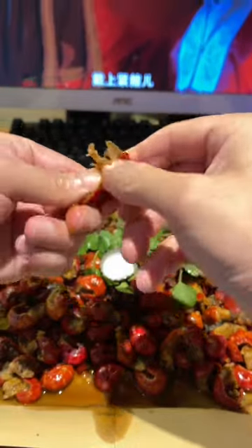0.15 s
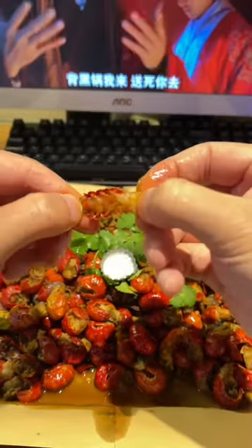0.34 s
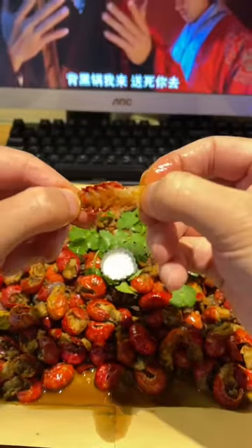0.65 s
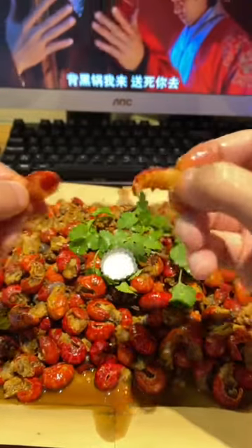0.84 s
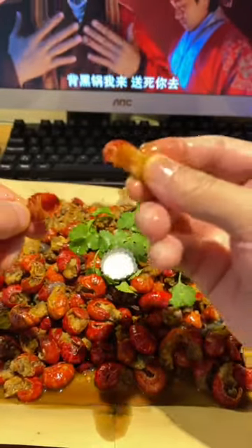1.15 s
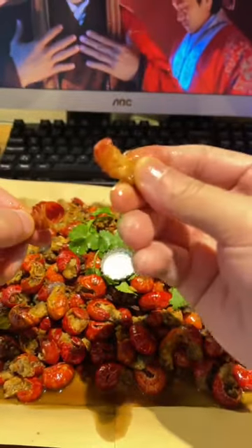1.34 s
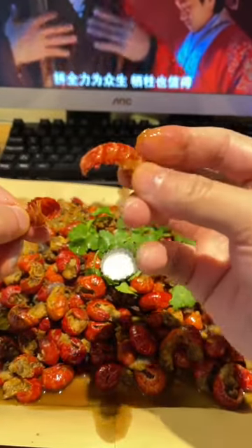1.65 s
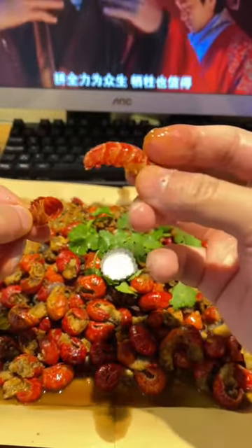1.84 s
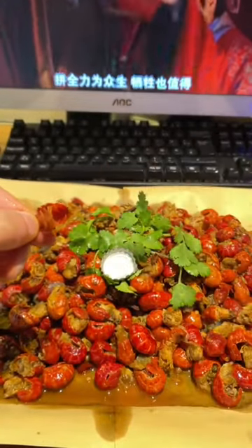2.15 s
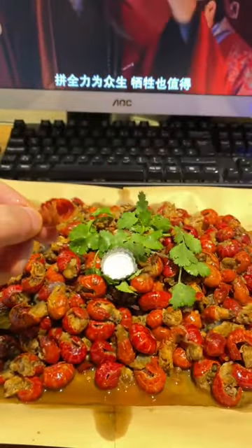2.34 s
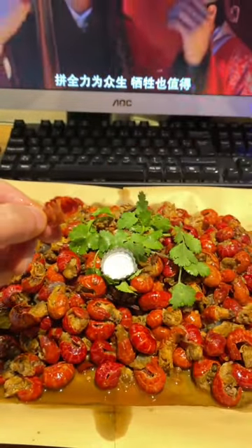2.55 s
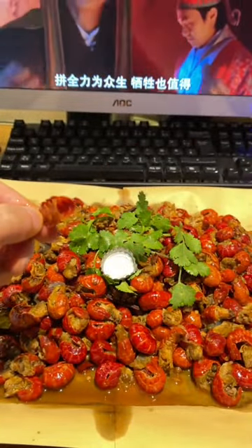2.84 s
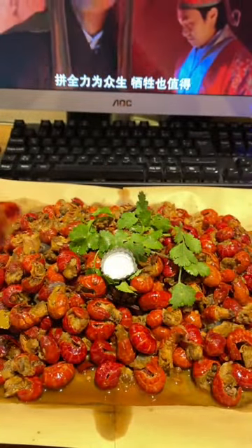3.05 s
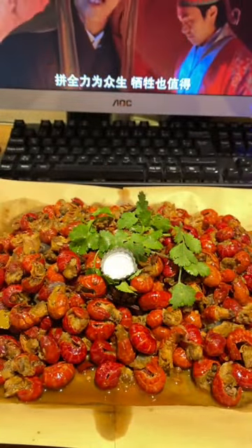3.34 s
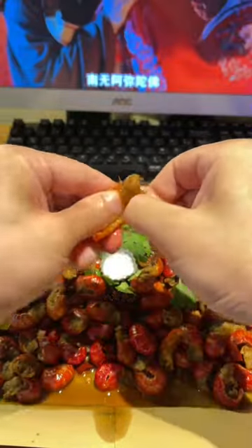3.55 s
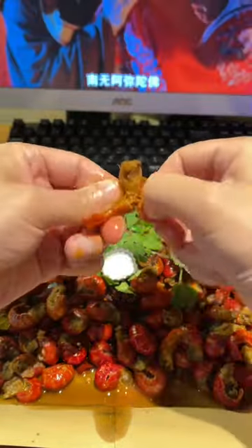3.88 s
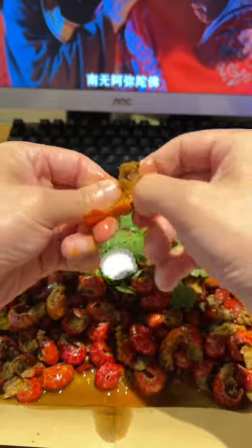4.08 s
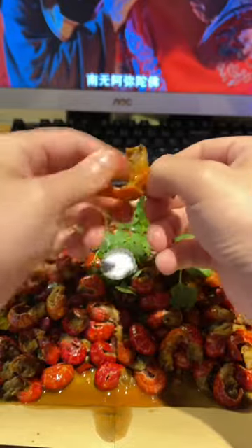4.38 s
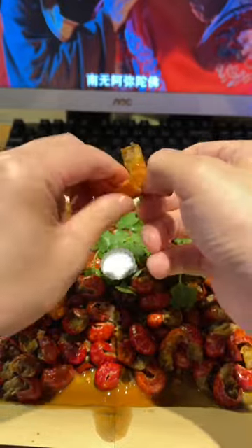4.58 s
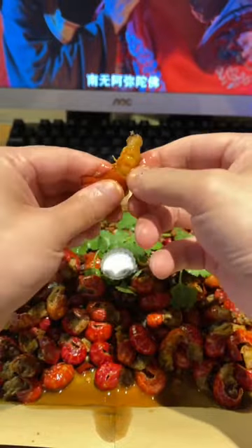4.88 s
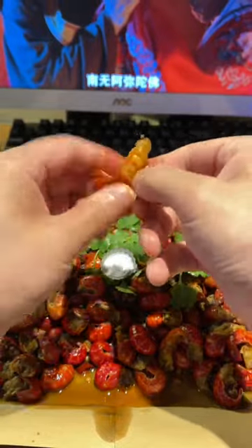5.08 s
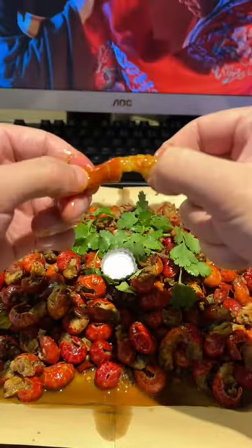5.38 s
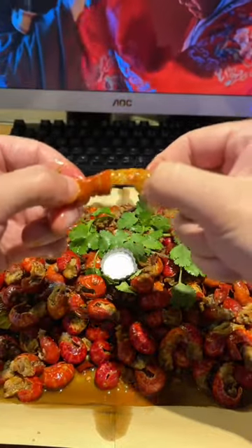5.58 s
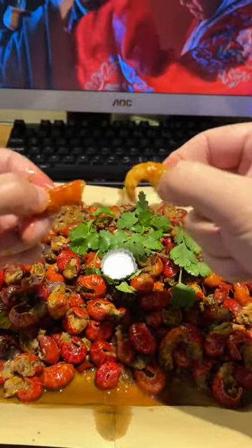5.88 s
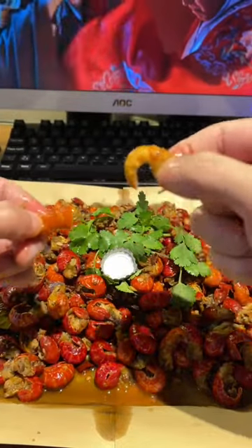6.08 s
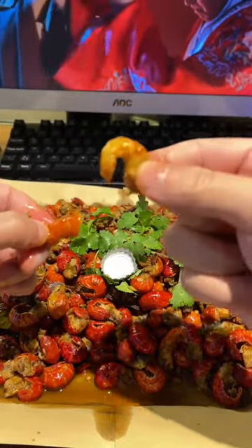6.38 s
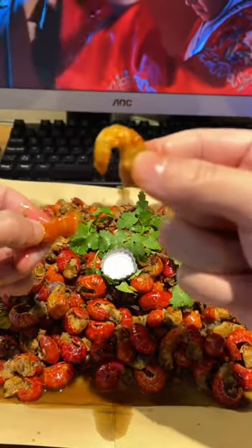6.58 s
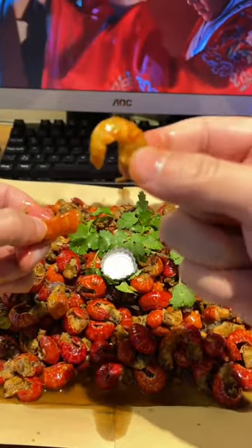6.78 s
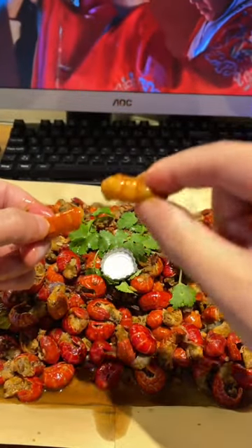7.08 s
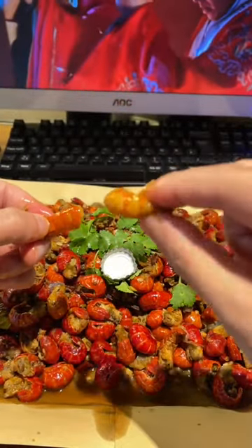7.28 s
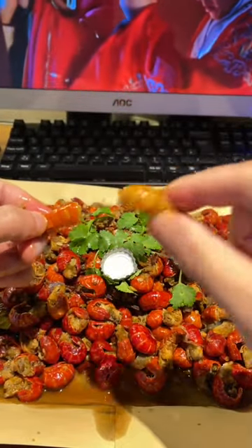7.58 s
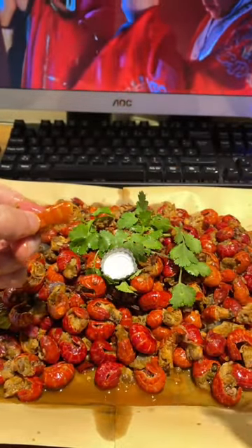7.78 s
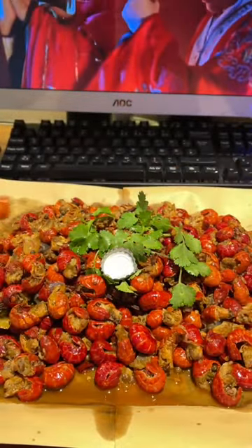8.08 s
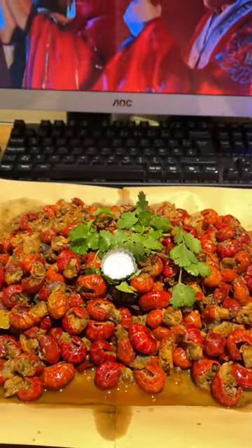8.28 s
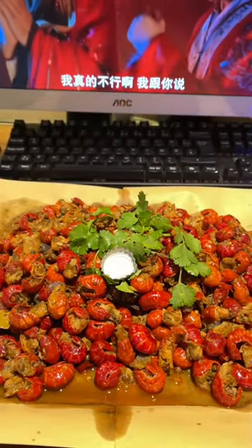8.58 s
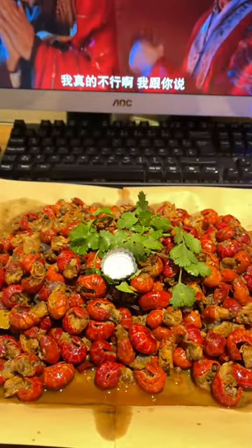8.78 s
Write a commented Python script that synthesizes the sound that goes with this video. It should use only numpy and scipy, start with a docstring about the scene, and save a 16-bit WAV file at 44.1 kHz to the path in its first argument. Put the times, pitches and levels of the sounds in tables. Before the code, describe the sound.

Crayfish shells crack in short, bright clicks as they are peeled by hand, with wet rubbing over a soft, fan-like hiss.

```python
"""Crayfish shell snaps in short, bright clicks as tails are peeled by hand in a small room.
Each snap is a splintering tick, a brief ring of the shell and a faint wash of echo. Wet shell
rubs over meat and fingers in many tiny slips, and one long pull draws the meat out. Behind it
a fan-like hiss swells slowly and sinks after loud snaps. The small, close microphone passes
no bass and overloads on the hardest snaps; four times the level dips briefly."""
import sys
import numpy as np
from scipy import signal
from scipy.fft import rfft, irfft, next_fast_len
from scipy.io import wavfile
from scipy.ndimage import uniform_filter1d

SR = 44100
rng = np.random.default_rng(int(sys.argv[2]) if len(sys.argv) > 2 else 0)


def int16_out(signal):
    """Quantize to a 16-bit WAV file."""
    q = np.round(np.clip(np.atleast_2d(signal).T, -1, 1) * 32767)
    wavfile.write(sys.argv[1], SR, q.astype(np.int16))


N = 393813


def amp(db):
    """Turn decibels into a gain to multiply by."""
    return 10 ** (np.asarray(db) / 20)


def rms_one(x):
    """Scale a signal so its average strength (rms) is 1."""
    return x / np.sqrt(np.mean(x ** 2) + 1e-20)


def curves(rows):
    """Join rows of (seconds, values..) with straight lines: one curve per value column."""
    seconds, *columns = np.transpose(rows)
    return [np.interp(np.arange(N) / SR, seconds, column) for column in columns]


def drift(rate_hz):
    """A smooth random wobble of size about 1; a higher rate wobbles faster."""
    r = np.exp(-80 * np.pi * rate_hz / SR)
    slow = signal.lfilter([1], [1, -2 * r, r * r], rng.standard_normal(N // 40 + 2002))[2000:]
    return np.interp(np.arange(N) / 40, np.arange(len(slow)), rms_one(slow))


def resonance(x, hz, width_hz):
    """Let through a band of sound around one pitch."""
    r = np.exp(-np.pi * width_hz / SR)
    feedback = [1, -2 * r * np.cos(2 * np.pi * hz / SR), r * r]
    return signal.lfilter(np.array([1, 0, -1]) * (1 - r * r) / 2, feedback, x)


def flickering_tone(x, tone, flicker_db, rate_hz):
    """Shape x by a tone table; its half-octave bands flicker partly alone, partly together."""
    size = next_fast_len(N)
    hz = np.fft.rfftfreq(size, 1 / SR)
    tone_hz, tone_db = np.transpose(tone)
    shaped = rfft(x, size) * amp(np.interp(np.log(np.maximum(hz, 1)), np.log(tone_hz), tone_db))
    octave = np.log2(np.maximum(hz, 1000) / 1000)
    out, together = 0, drift(5.8)
    for k in range(9):
        band = irfft(shaped * np.clip(1 - np.abs(2 * octave - k), 0, 1), size)[:N]
        out = out + band * amp(flicker_db * (.7 * together + drift(rate_hz)))
    return rms_one(out)


# How the hiss swells and sinks. Each row: time in seconds, level in dB.
HISS_LEVEL = [(0.0, -37.5), (.58, -31), (.85, -29.5), (1.45, -25), (2.072, -24.5), (2.08, -39), (2.72, -45),
              (2.93, -47), (3.51, -47), (4.24, -46.5), (5.15, -38), (5.46, -34), (5.9, -34.5), (6.15, -44),
              (6.92, -41.5), (7.16, -37), (8.17, -39), (8.61, -47.5), (8.93, -46)]
# The tone of the hiss. Each row: frequency in Hz, relative level in dB.
HISS_TONE = [(150, -110), (250, -88), (342, -64.5), (500, -65), (733, -51.5), (903, -64), (1350, -28),
             (1420, -21), (1840, -24), (3430, -1), (3750, -6), (4230, -2), (7500, -11.5), (13500, -30),
             (15800, -33.5)]
# Faint whistles. Each row: pitch in Hz, filter width in Hz, level in dB compared with the hiss.
HISS_WHISTLES = [(336.6, 9.8, -72), (1450, 8.5, -31), (1630, 16, -37.5), (2226, 11, -46), (2874, 22, -20.5),
                 (3460, 17, -17.5), (3790, 21, -18), (3990, 53, -15.5), (4170, 20, -22), (4183, 54, -10.5),
                 (4300, 25, -29.5), (4950, 19, -18.5), (5400, 18, -31), (5600, 26, -17.5), (5800, 8.8, -29),
                 (7900, 20, -32.5), (12290, 15, -46.5), (13400, 80, -44.5)]
def hiss():
    """Smooth, airy, fan-like noise with weak whistles that flutter."""
    air = flickering_tone(rng.standard_normal(N), HISS_TONE, flicker_db=.45, rate_hz=15)
    for hz, width_hz, level_db in HISS_WHISTLES:
        gain = amp(level_db + 1.5 * drift(rate_hz=11))
        band = resonance(rng.standard_normal(N), hz, width_hz)
        air = air + gain * rms_one(resonance(band, hz, width_hz))
    return amp(curves(HISS_LEVEL)[0]) * rms_one(air)


# The long pull that draws the meat out. Each row: time in seconds, level in dB, treble over bass in dB.
LONG_PULL = [(5.925, -58, 0), (5.95, -27, -5), (5.99, -17.5, 1), (6.011, -20.5, 12), (6.015, -12, 6),
             (6.03, -11, -7.5), (6.055, -14.5, 1), (6.064, -12.5, 9), (6.095, -21.5, 2), (6.102, -18, -8),
             (6.15, -42, 6)]
# Short slides. Each row: start in seconds, hold in seconds, level in dB, treble over bass in dB.
SHORT_SLIDES = [(0.138, 0.0071, -32, 2), (.395, 0.053, -25.5, -4), (0.497, .03, -35, 10),
                (2.217, 0.16, -41.5, 2), (3.781, .01, -39.5, 11), (6.961, 0.034, -31, 3)]
def hand_strokes():
    """How strongly the hands rub over time: one gain for the low part, one for the high part."""
    rise_s, fade_db_per_s = 0.019, 300
    t = np.arange(N) / SR
    pull_db, pull_treble_db = curves(LONG_PULL)
    pulling = (t > LONG_PULL[0][0]) & (t < LONG_PULL[-1][0])
    strokes = [(amp(pull_db) * pulling, pull_treble_db)]
    for start, hold, level_db, treble_db in SHORT_SLIDES:
        rise = np.clip((t - start) / rise_s, 0, 1) ** 2
        fade_db = fade_db_per_s * np.maximum(t - start - rise_s - hold, 0)
        strokes.append((rise * amp(level_db - fade_db), treble_db))
    return [sum(gain * amp(side * tilt_db / 2) for gain, tilt_db in strokes) for side in (-1, 1)]


# The tone of the rubbing. Each row: frequency in Hz, relative level in dB.
RUB_TONE = [(710, -69), (1200, -2), (2220, -10), (2910, -8.5), (3200, -3.5), (4330, -1), (4980, -7.5),
            (5920, -4), (9420, -16.5), (13700, -48), (15800, -52)]
# Notes of the hollow shell. Each row: pitch in Hz, width in Hz before widening, relative level in dB.
HOLLOW_NOTES = [(2960, 110, -3.5), (3820, 260, -16), (4525, 9.4, 3.5), (5690, 110, 3.5), (6860, 120, -0.5),
                (8460, 42, -17.5)]
def rubbing():
    """Wet shell slides over meat and fingers in many tiny slips, which make the hollow shell ring."""
    low_gain, high_gain = hand_strokes()
    slips = rng.standard_normal(N) * amp(rng.exponential(1, N) + drift(rate_hz=120))
    rub = flickering_tone(slips, RUB_TONE, flicker_db=2.2, rate_hz=40)
    hollow = 0
    for hz, width_hz, level_db in HOLLOW_NOTES:
        grip_db = 9.4 * drift(rate_hz=23)   # notes come and go as the grip shifts
        hollow = hollow + amp(level_db + grip_db) * rms_one(resonance(slips, hz, 1.7 * width_hz))
    rub = rms_one(rub + amp(-3.5) * rms_one(hollow))
    hz = np.fft.rfftfreq(N, 1 / SR)
    high = irfft(rfft(rub) / (1 + (4800 / (hz + 1)) ** 4), N)   # the part above 4800 Hz
    return (rub - high) * low_gain + high * high_gain


# The small room's echo. Each row: middle of a band in Hz, seconds it takes to fade by 60 dB.
ROOM_FADES = [(2600, 0.13), (5200, 0.17), (9500, 0.043)]
def room_echo(snap, noise, t):
    """The room answers the first instant of a snap with a dying wash of similar tone."""
    onset = snap[:SR // 500] * np.exp(-t[:SR // 500] / 0.00016)
    room = sum(amp(-60 * t / fade_s) * resonance(noise, hz, 1.32 * hz) for hz, fade_s in ROOM_FADES)
    room *= 1 - np.exp(-t / 0.00098)
    room *= 1 + np.exp(-t / 0.004)   # early echoes off the desk are stronger
    return signal.fftconvolve(room, onset)[:len(t)] / np.linalg.norm(onset)


# Runs of crackle. Each row: start in seconds, length in seconds, average peak in dB, pitch in Hz.
CRACKLE_RUNS = [(2.358, .1, -22, 7900), (2.52, 0.034, -22, 6700), (2.94, .05, -30, 5800)]
def crackle():
    """Faint snaps at uneven moments, returned as extra rows for shell_snaps()."""
    gap_s, fade_s, tick_db = .012, 0.0021, -2
    rows = []
    for start, length, peak_db, hz in CRACKLE_RUNS:
        chances = rng.uniform(-1, 1, (40, 3))[:round(length / gap_s)]
        for k, (late, softer, higher) in enumerate(chances):
            when = start + gap_s * (k + late / 2)
            rows.append((when, peak_db - 0.5 * softer, hz * (1 + .12 * higher), fade_s, tick_db))
    return rows


# The shell breaking. Each row: start in seconds, peak in dB (capped at HARDEST_DB), ring pitch in Hz,
# seconds for the ring to fade by 60 dB, gain of the tick in dB compared with the ring.
SNAPS = [(1.3156, -11, 7200, .003, -18), (1.3232, -10.5, 6700, .0035, 0.5), (1.4629, -9.5, 8600, .0034, 5),
         (2.0294, -5, 5800, 0.0018, -12), (2.0394, -17, 9000, .0051, -3), (2.048, -19, 5200, .0048, 1),
         (2.0606, -2.5, 5840, 0.0024, 0.5), (2.071, -5.3, 6560, 0.0031, -14), (2.235, -28, 7500, .0057, 5),
         (2.3442, -16, 8200, 0.004, 1), (2.4876, -27, 8350, .0023, -4), (2.551, -14, 6050, 0.00069, -24),
         (2.5742, -5.5, 6900, 0.0014, -3), (2.5892, 13.5, 4680, 0.011, -5.5),
         (2.5932, -3.5, 7300, .0029, 2), (2.5957, -9, 4710, .003, 2), (2.6051, -7, 7030, .0014, -22),
         (2.737, -22, 6200, 0.0055, -8), (2.7494, 3.5, 6230, 0.0017, -7), (2.7537, -13, 6250, 0.0027, -21),
         (2.7606, 2, 6330, 0.0024, -8.5), (2.7652, -6, 6000, .005, 8), (2.7691, 7, 5750, 0.005, -6),
         (2.7742, -6, 5800, 0.0057, 5), (2.7778, -4.5, 3960, .0052, 8), (2.8092, -26, 6300, 0.0036, -21),
         (2.8283, -8, 7000, 0.0012, -35), (2.713, -23, 8000, .002, 1), (2.8788, -23.5, 3680, 0.0037, -37),
         (2.9603, -34, 5860, 0.0015, 5), (3.1298, -15, 5620, 0.00081, -27), (3.297, -28, 6000, 0.0022, -9),
         (3.788, -23, 3760, 0.0023, -12), (3.81, -18.5, 5600, 0.0027, -24),
         (3.8171, -16, 5700, 0.0015, -31), (5.3186, -17, 4390, .0179, -18),
         (5.8202, -4.5, 3980, 0.0019, -8.5), (5.8277, -9.5, 4000, 0.0062, -15),
         (5.8797, -15.5, 3820, 0.02, -36), (5.8848, -18, 3700, 0.024, -37), (6.599, -30.5, 9940, .03, -20),
         (6.63, -24.5, 5120, 0.023, -20), (6.6995, -21, 6740, 0.0011, -3), (6.761, -19, 7200, 0.0028, -13),
         (6.845, -19, 6700, 0.0055, -5), (6.9508, -13.5, 6500, .0023, -11),
         (6.9518, -10.5, 3870, 0.0017, -18), (6.9703, -19, 7000, .0012, 5), (6.9826, -6, 5500, 0.0015, 3),
         (6.992, -13, 5300, 0.0017, -9.5), (7.061, -28, 4000, .004, -13), (7.123, -10.5, 6000, 0.0044, -38),
         (7.1294, -22, 6000, 0.0062, -27), (7.1413, -8, 6300, 0.0042, -46), (7.1502, -10, 6100, .005, -25),
         (7.1697, -15, 6200, 0.0023, -32), (7.1804, -10.5, 6000, 0.0023, -35),
         (7.2236, -23, 7500, .0022, -5), (7.2863, -19, 7500, .0022, -6), (7.3043, -11, 6300, 0.0023, 4),
         (7.5145, -7, 3830, 0.0047, 0), (7.5216, -17, 7560, .0037, -14), (7.546, -2.5, 5850, 0.00079, -6),
         (7.5503, -7.5, 7450, 0.0011, -15), (7.579, -21, 6550, .003, -10), (7.6587, -9, 7300, .0021, -24),
         (7.7946, -24, 7050, .003, -19), (7.8106, -19.5, 6500, .003, -28), (7.993, -24, 5400, 0.017, -20),
         (8.0101, -1.5, 5570, 0.0034, -18), (8.0145, -8.5, 4220, .012, -28),
         (8.1188, -18, 5540, 0.017, -32), (8.1654, -9.5, 6420, 0.0035, -32), (8.178, -22, 5700, .0093, -22),
         (8.2228, -10.5, 6700, .0032, -10), (8.2874, -16.5, 6400, 0.0026, -8),
         (8.3118, 5, 5930, .0026, -31), (8.4743, -34, 4030, .0046, -3), (8.4852, -8.5, 4260, 0.0019, -9)]
HARDEST_DB = 6
def shell_snaps():
    """Brittle shell splinters with a sharp tick and rings briefly at two pitches; the room echoes it."""
    t = np.arange(SR // 4) / SR
    rows = SNAPS + crackle()
    noise = rng.standard_normal((len(rows), 2, len(t)))
    out = np.zeros(N + len(t))
    for (grit, echo_noise), (start, peak_db, hz, fade_s, tick_db) in zip(noise, rows):
        ring = np.sin(2 * np.pi * hz * t) * amp(-60 * t / fade_s)
        phase = grit[-1]
        upper_ring = np.sin(2 * np.pi * 1.38 * hz * t + phase) * amp(-60 * t / (1.87 * fade_s))
        splinters = resonance(resonance(grit, 4200, 10000), 4900, 8000)
        tick = 1.37 * splinters * amp(-60 * t / (0.001 + fade_s))
        rise = np.sin(np.pi / 2 * np.minimum(t * hz / 2.34, 1)) ** 2   # full after 2.34 cycles
        snap = (ring + amp(-14) * upper_ring + amp(tick_db) * tick) * rise
        snap /= np.abs(snap).max()
        echo = amp(-25.5 + 0.16 * peak_db) * room_echo(snap, echo_noise, t)   # more on loud snaps
        at = round(start * SR)
        out[at:at + len(t)] += amp(min(peak_db, HARDEST_DB)) * (snap + echo)
    return signal.sosfilt(signal.butter(2, 11500, fs=SR, output="sos"), out[:N])


def scene():
    """Everything reaches one microphone, where the peeling sounds lose their bass."""
    bass_cut = signal.cheby2(6, 60, 1103, "high", fs=SR, output="sos")
    peeling = signal.sosfilt(bass_cut, rubbing() + shell_snaps())
    return (hiss() + peeling)[None]


# Brief dips in the sound. Each row: start in seconds, length in seconds, level change in dB.
LEVEL_DIPS = [(3.358, 0.0062, -11), (3.372, 0.0057, -14), (6.6838, 0.0052, -21), (8.537, 0.0074, -17)]
def record(dry):
    """The level dips briefly; the microphone bends and clips big peaks and loses the highest treble."""
    t, gain_db = np.arange(N) / SR, np.zeros(N)
    for start, length, change_db in LEVEL_DIPS:
        gain_db += change_db * ((t > start) & (t < start + length))
    sound = dry * uniform_filter1d(amp(gain_db), size=21)
    thud = np.minimum(sound ** 4, 1)   # the slightly lopsided microphone bends peaks one way
    knock = resonance(thud, hz=1070, width_hz=1800)
    overloaded = np.clip(sound + amp(-22.5) * thud + amp(-21.5) * knock, -1, 1)
    treble_cut = signal.cheby2(10, 40, 15900, fs=SR, output="sos")
    return signal.sosfilt(treble_cut, overloaded)


dry = scene()
out = record(dry)
int16_out(out)
```